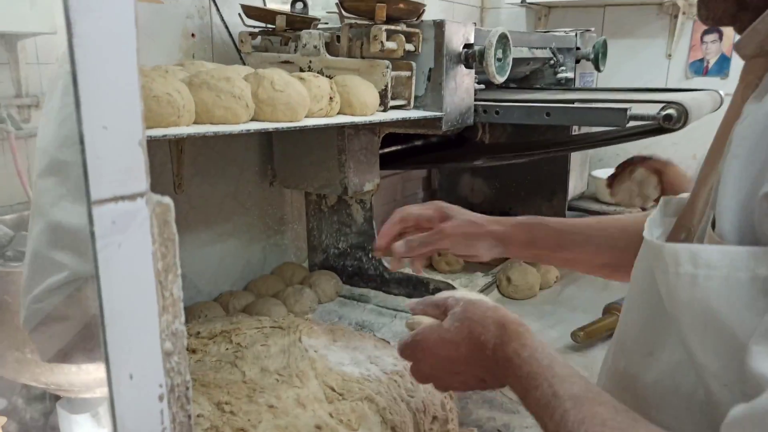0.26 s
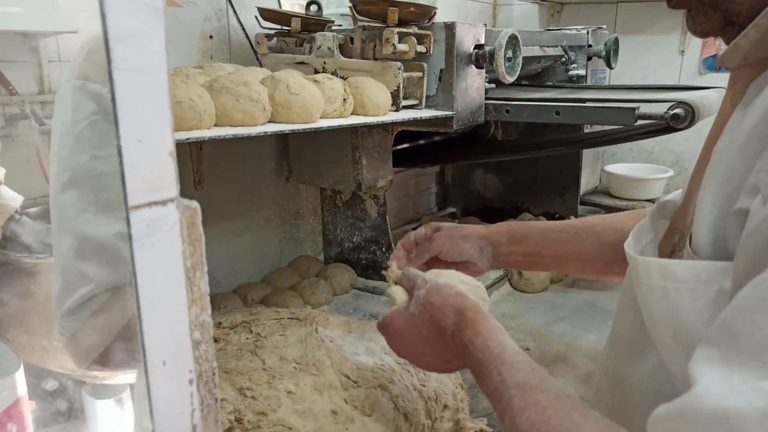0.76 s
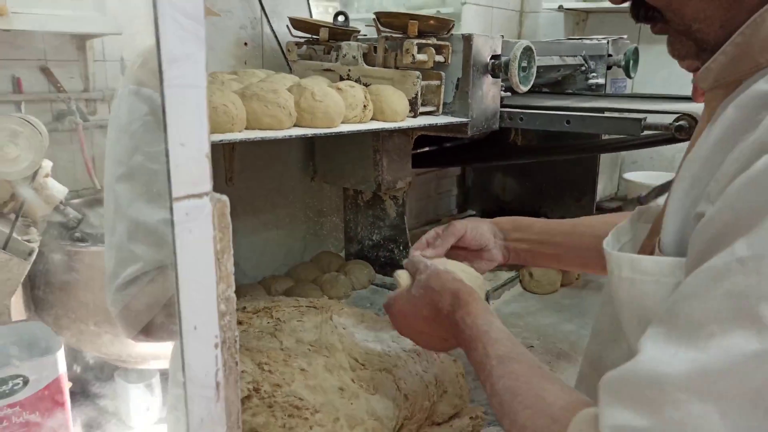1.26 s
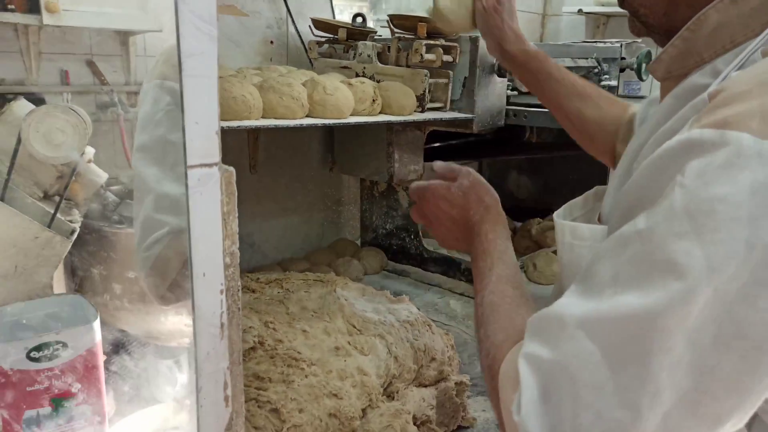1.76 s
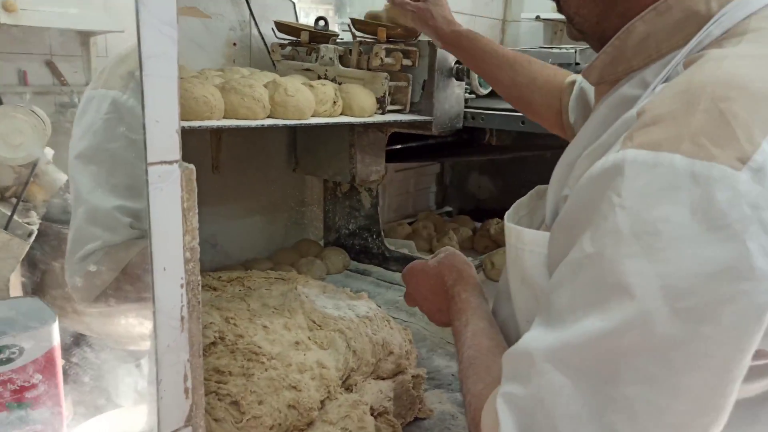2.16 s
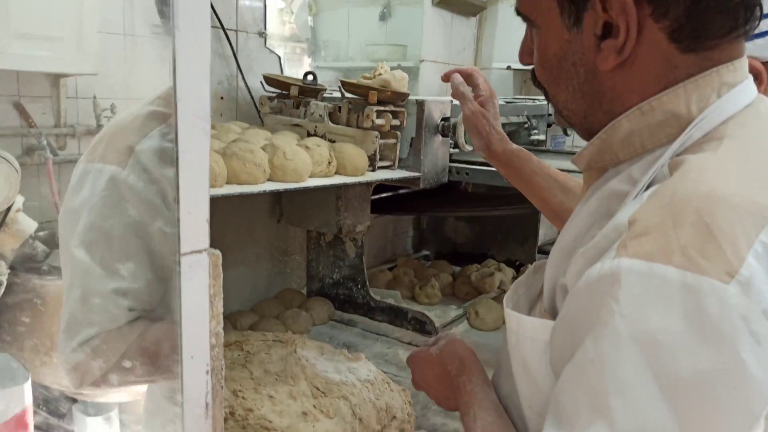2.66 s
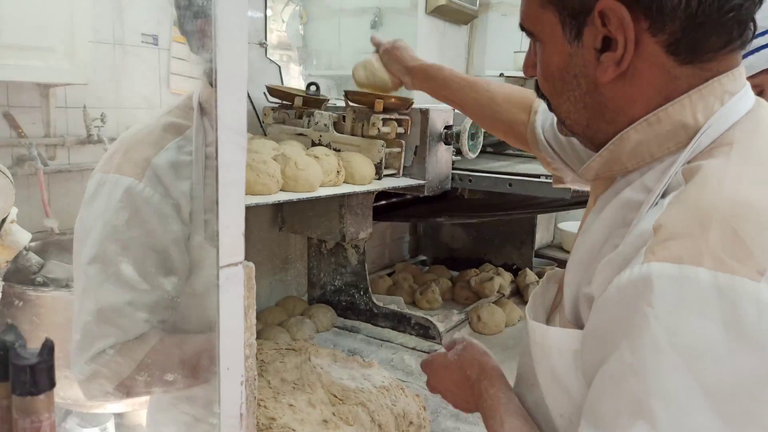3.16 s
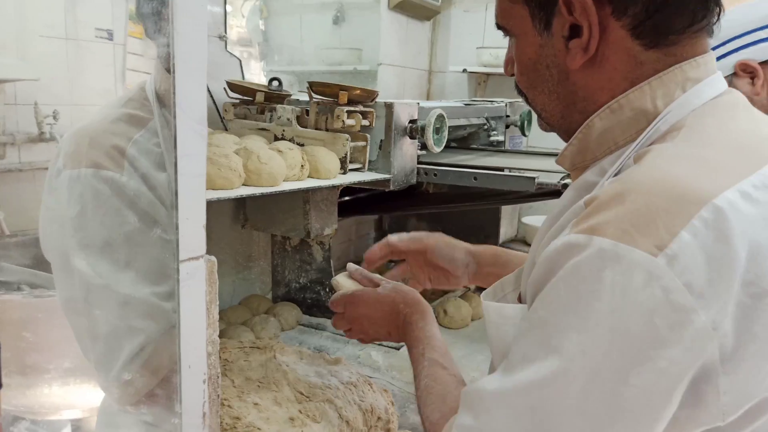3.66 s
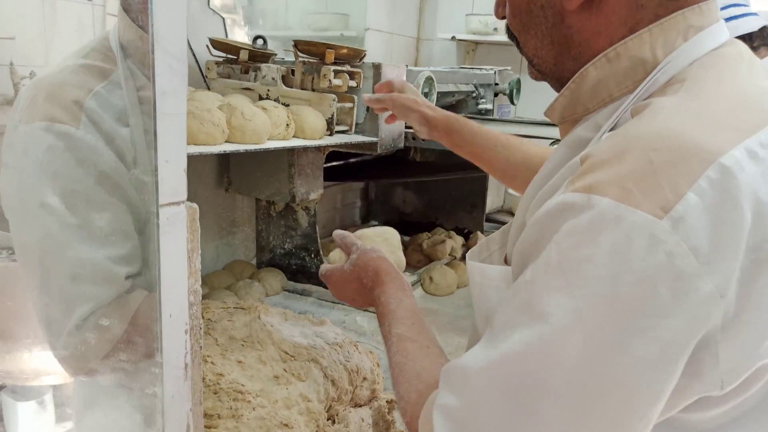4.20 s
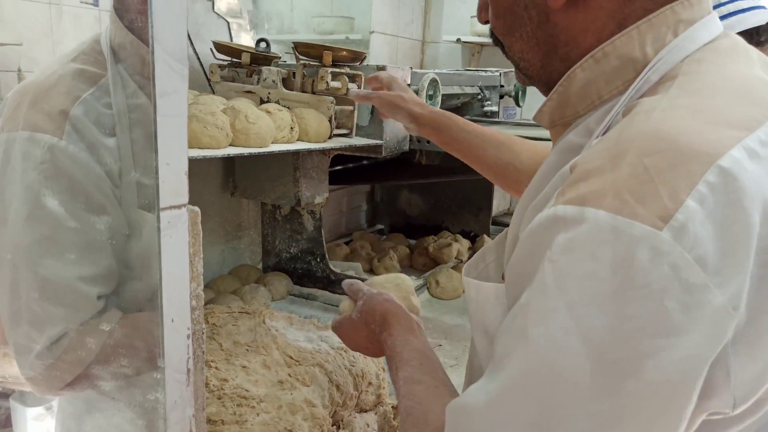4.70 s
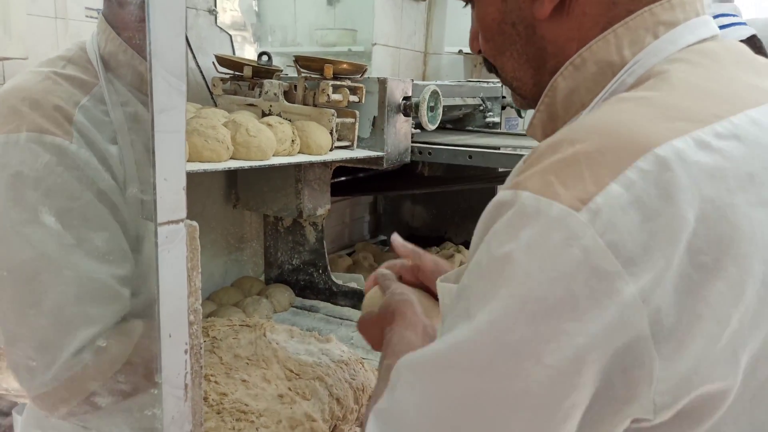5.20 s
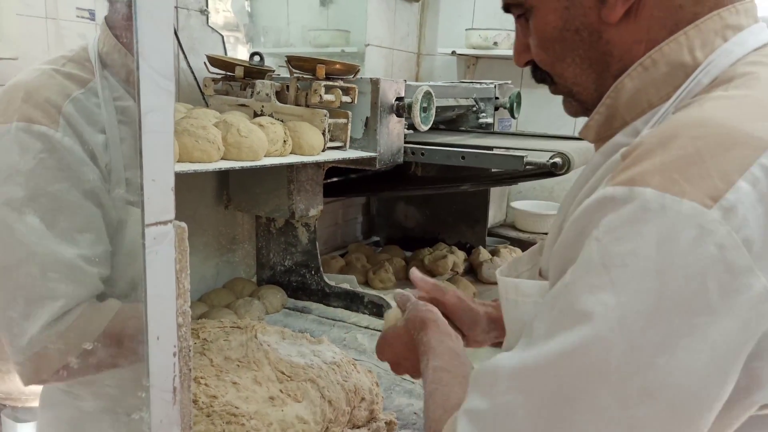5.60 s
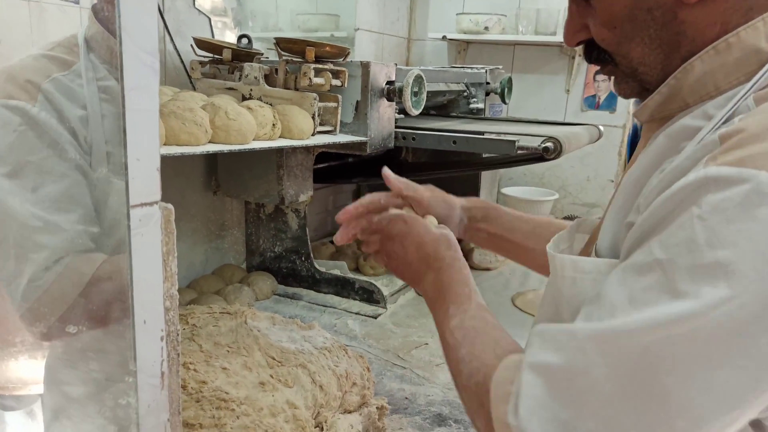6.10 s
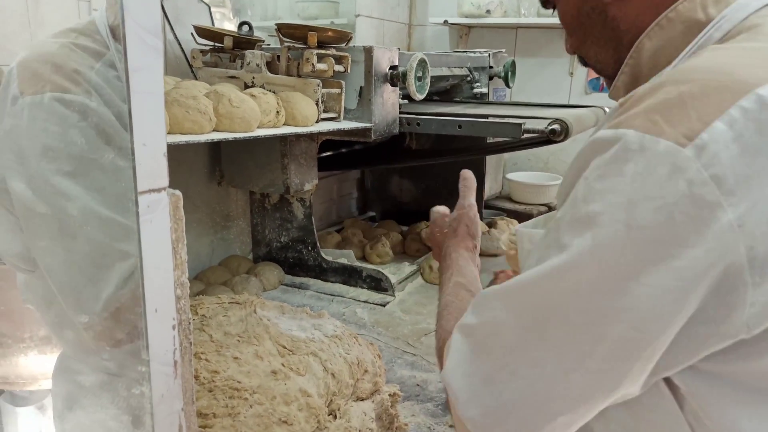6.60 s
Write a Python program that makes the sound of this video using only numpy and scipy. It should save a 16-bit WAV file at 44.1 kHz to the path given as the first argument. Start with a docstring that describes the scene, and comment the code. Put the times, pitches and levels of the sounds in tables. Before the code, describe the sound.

Close dough pat, two hollow knocks and bursts of rattling brass scale pans over a constant low motor drone in a tiled bakery.

```python
"""Bakery with a balance scale

In a small tiled bakery, dough machines hum (sines), rumble and hiss (coloured noise) without pause.
Close by a baker pats dough (pulses and damped swings) and drops it on a scale whose beam knocks on its
stops (pulses and shelf modes); brass pans and weights clink (noise and decaying modes) and squeak.
Hands and sleeves rustle, the bench is tapped, pivots tick; the drone dips briefly after each hard knock."""
import sys
import numpy as np
from scipy import signal
from scipy.fft import rfft, irfft, next_fast_len
from scipy.io import wavfile
from scipy.ndimage import uniform_filter1d, minimum_filter1d, map_coordinates

SR = 44100
rng = np.random.default_rng(int(sys.argv[2]) if len(sys.argv) > 2 else 0)


def master_out(mix):
    """Clip the mix to full scale and print it as 16-bit PCM to the path in sys.argv[1]."""
    frames = np.transpose(np.atleast_2d(mix))
    ceiling = np.clip(frames, -1, 1)
    pcm = np.round(ceiling * 32767).astype(np.int16)
    wavfile.write(sys.argv[1], SR, pcm)


N = 302085

# Relative noise spectrum of the drives' rumble [freq_hz, density_db_per_hz]
RUMBLE_SPECTRUM = [(15, -83), (25, -47), (37, -36.5), (70, -10), (82, -10.5), (102, -2), (125, -10),
                   (189, -2.5), (240, -10), (280, -10.5), (362, -11), (452, -17.5), (510, -20.5),
                   (555, -15), (1500, -34.5), (1950, -51), (3300, -120)]
# Relative noise spectrum of the belts' hiss [freq_hz, density_db_per_hz]
HISS_SPECTRUM = [(400, -7.5), (900, -3.5), (1600, -6), (2450, -6), (3040, -9.5), (3470, -6), (4550, -6),
                 (4950, -16), (5900, -13.5), (6500, -6), (7550, -9.5), (8400, -18.5), (12000, -27.5),
                 (16000, -25.5)]
# Resonances of the machine housings, relative levels [freq_hz, width_hz, level_db]
HOUSING_MODES = [(126.3, 6.1, 5.5), (149.2, 14.3, 2), (174.2, 6.8, -3), (190.4, 10.6, 0), (275.7, 14.8, 0),
                 (307.1, 19.6, -2), (356.3, 11.4, -6), (406.6, 31, -12.5), (509.4, 28.5, -7),
                 (532.5, 12, -11), (633, 18, -22), (762, 37, -18)]
# Lines of the motors, against the hum level [freq_hz, level_db]
MOTOR_LINES = [(100.45, 1), (73.7, -14.5), (649, -23.5), (519.5, -24), (1165, -44)]
# Slow drift of the machines' level [time_s, hum_db, rumble_db]
MACHINE_DRIFT = [(0, -28, -27.5), (2.6, -30, -29), (3.15, -30, -25), (3.75, -30.5, -27.5),
                 (4.2, -28, -28.5), (5.4, -31.5, -27.5), (6.5, -27.5, -27), (6.85, -32.5, -27.5)]
HUM_WAVER_DB, HUM_WAVER_RATE = 0.03, 6.5  # depth; random knots per second
HISS_DB, HISS_FALL_DB_PER_S = -37.5, 0.16
HISS_DIRECT_DB, LEFT_LEAD_S = -9, 0.00026  # the part of the hiss that arrives at the left first
# The drone dips by as much as the thud passes a threshold; the hum takes all of it, the rest a share
DIP_OVER_DB, DIP_S, RUMBLE_DIP_SHARE, HISS_DIP_SHARE = -20, 0.049, 0.31, .12

# Likeness of left and right in a diffuse noise [freq_hz, likeness_ratio]
LIKENESS = [(60, 1), (130, 1), (260, 0.83), (500, 0.87), (1000, 0.052), (2500, 0.035), (12000, .05)]
# Decay time of the tiled room [freq_hz, t60_s]
ROOM_DECAY = [(150, 0.34), (1000, 0.48), (4000, 0.36), (8000, 0.19), (15000, 0.24)]
# Tone of the whole sound, almost empty from 8.8 to 11.3 kHz [freq_hz, gain_db]
TONE_RESPONSE = [(20, -0.5), (8450, 1.5), (8850, -25), (10200, -31.5), (11300, -30), (11750, 5),
                 (13000, 3.5), (16000, 1)]
TOP_HZ = 15800

# Hands and sleeves brushing over dough [centre_s, half_length_s, level_db]
RUBS_TIMED = [(0.21, 0.036, -39), (0.89, 0.16, -39), (1.068, 0.065, -33.5), (1.85, 0.1, -37.5),
              (4.407, 0.037, -40.5), (5.32, 0.074, -39), (5.889, 0.095, -39)]
# Relative spectrum of the friction [freq_hz, density_db_per_hz]
CLOTH_SPECTRUM = [(600, -31.5), (1500, 1), (4000, 1.5), (5400, -3.5), (7200, 5.5), (8400, -10),
                  (13500, -19), (16000, -12)]

# Dry ticks of the scale's pivots, too light to ring it [start_s, level_db]
TICKS_TIMED = [(4.5945, -25), (4.9575, -26.5), (4.962, -28.5)]
# Relative spectrum of a pivot tick [freq_hz, density_db_per_hz]
PIVOT_SPECTRUM = [(900, -20), (1500, -12), (2700, -10), (3700, 2.5), (4500, -1.5), (5400, -9.5), (6500, -2),
                  (7700, -3), (9000, -15.5), (16000, -23)]
PIVOT_T60_S = 0.031

# Squeaks of thin metal [centre_s, half_length_s, pitch_hz, level_db]
SQUEAKS_TIMED = [(0.212, 0.026, 7450, -39.5), (.205, .02, 6570, -44), (0.25, .024, 6570, -41.5),
                 (3.83, .014, 3435, -43), (4.388, 0.0099, 7000, -38)]
SQUEAK_WAVER, SQUEAK_FLUTTER_DB = .004, 3  # share of the pitch; depth

# Light taps on the wooden bench [start_s, click_db, body_db]
TAPS_TIMED = [(0.4644, -23, -20.5), (.469, -26, -22.5), (.477, -25.5, -33.5), (1.357, -27.5, -42.5),
              (1.424, -37.5, -25.5), (4.145, -29.5, -41), (6.165, -36, -29.5)]
# Relative spectrum of the click on wood [freq_hz, density_db_per_hz]
WOOD_SPECTRUM = [(300, -1), (900, -2.5), (1100, -8.5), (1700, 6), (2100, -3), (2600, -1), (4400, -8),
                 (5400, -18), (7400, -6), (9000, -29), (15000, -31)]
# Relative spectrum of the bench's body [freq_hz, density_db_per_hz]
BENCH_SPECTRUM = [(100, -13), (200, 1.5), (340, 8), (480, -5), (650, -21), (900, 0), (1200, -18),
                  (3000, -40.5)]

# The palm, then the fingers land on the dough [start_s, thump_db, smack_db, thump_hz]
SLAPS_TIMED = [(1.6529, -19, -13.5, 330), (1.6565, -21.5, -12.5, 290), (1.6611, -12.5, -24, 210),
               (1.6709, -28, -20.5, 210), (1.674, -31, -18.5, 210)]
# Relative spectrum of skin meeting dough [freq_hz, density_db_per_hz]
SMACK_SPECTRUM = [(300, -7.5), (600, -3.5), (900, -3), (1250, 1.5), (1650, -6.5), (2000, -17), (2600, -19),
                  (4500, -29), (7000, -21), (14000, -54)]
# Relative spectrum of the puff of the dough [freq_hz, density_db_per_hz]
DOUGH_SPECTRUM = [(35, -19), (80, -15), (130, 10.5), (250, 12), (450, -11), (750, -10), (1200, -11.5),
                  (2200, -19), (4000, -22), (8000, -21.5), (16000, -53)]
# Resonances of the hollow between the cupped hands [freq_hz, level_db, t60_s]
HOLLOW_MODES = [(965, -1, 0.11), (1150, 0, 0.09), (1353, -6.5, .08)]
HOLLOW_DB = -16  # ring of the hollow against the slap
THUMP_T60_S, THUMP_DB = .035, 3  # the dough yields in a few dead swings; level against its puff

# The beam hits its stop [start_s, thud_db, shelf_db, click_db, push_db]
KNOCKS_TIMED = [(2.4665, -10, -14.5, -20, -23), (2.8219, -11.5, -12.5, -21, -37)]
# Modes of the scale on its shelf [freq_hz, level_db, t60_s]
SHELF_MODES = [(186, -8, .2), (275, -9, .14), (358, -1, .19), (411, -7, .15), (452, -7, .11),
               (500, -6, .12), (541, -3, .18), (582, -7, .14), (628, -3.5, .2), (695, -8, .14),
               (763, -8, .13), (810, -10, .11), (860, -10.5, .12), (936, -16, .12), (1000, -17, .12),
               (1139, -19, .12), (1330, -21, .1)]
# Relative spectrum of the thud [freq_hz, density_db_per_hz]
THUD_SPECTRUM = [(30, -25.5), (100, -15.5), (200, -3.5), (350, 2), (500, 1.5), (650, -0.5), (830, -0.5),
                 (1050, -15.5), (1300, -18), (1800, -21.5), (3500, -32.5), (8000, -49)]
# Relative spectrum of the click on the stop [freq_hz, density_db_per_hz]
CLICK_SPECTRUM = [(500, -28), (1500, 1.5), (4000, -2), (5400, -10), (7200, 0), (9000, -13), (15000, -35)]
BOUNCE_S, BOUNCE_DB = 0.011, -4  # the beam bounces once on its stop
PUNCH_DB = 7  # the shelf flexes as a whole at the blow; against the thud
PUSH_HZ, PUSH_T60_S = 52, .07  # the bench gives under the blow

# The scale is jolted and its metal parts strike and rattle
# [start_s, clash_db, pan_db, weight_db, beam_db, frame_db, rattle_length_s, first_rebound_db]
CLINKS_TIMED = [(1.4304, -27, -55.5, -28, -38, -37.5, .003, 1),
                (1.4348, -15, -52, -16.5, -30, -38.5, 0.0031, -6.5),
                (1.4398, -17, -42, -17, -34, -41, .004, -12),
                (1.448, -17.5, -46, -18.5, -30, -40, 0.011, -14),
                (1.461, -26, -49, -28.5, -36, -44, .02, -2),
                (1.488, -27.5, -54, -28, -39.5, -45, 0.0047, -9.5),
                (2.1035, -17.5, -42.5, -36.5, -19.5, -31.5, .010, -7),
                (2.117, -19, -45, -36, -24.5, -31, .02, -1.5), (2.294, -36.5, -56, -50, -51, -37, .006, 5),
                (2.303, -26, -52, -38.5, -41, -29, .004, -11),
                (2.3088, -22.5, -57, -41, -40, -25.5, 0.0029, -6.5),
                (2.7365, -26, -55, -38.5, -35.5, -37, .003, -3.5),
                (2.745, -21.5, -54, -29, -33, -44, .026, -2.5),
                (3.060, -12.5, -23, -38, -34, -16.5, 0.0039, -2.5),
                (3.072, -16.5, -27.5, -40, -38, -34, .011, -9.5),
                (3.089, -15.5, -25.5, -38, -31, -38.5, .008, 0),
                (3.106, -21, -28, -38.5, -32, -38.5, .010, -2),
                (3.122, -11, -22, -39.5, -35.5, -35, .028, -6.5),
                (3.2172, -14, -26.5, -33, -29, -24, .003, -2),
                (3.229, -16, -30, -30.5, -31.5, -37, 0.0032, -8),
                (3.2405, -13.5, -28.5, -34, -29.5, -40.5, 0.011, -10),
                (3.262, -16, -29.5, -31, -32, -39, .010, -3),
                (3.283, -17.5, -29, -37.5, -37, -38, .025, -8)]
# Relative spectrum of the metal clash [freq_hz, density_db_per_hz]
CLASH_SPECTRUM = [(500, -8), (900, 0.5), (1250, -12.5), (1600, 0), (2000, -5), (2400, -1.5), (3100, -2.5),
                  (4100, -2), (5200, -6), (6600, 6.5), (7400, -5.5), (8400, -0.5), (11600, -11.5),
                  (13300, -17.5), (16000, -11.5)]
# Modes of the pan [freq_hz, level_db, t60_s]
PAN_MODES = [(897, -9.5, 0.12), (1133, -13.5, 0.18), (1467, -8.5, 0.23), (1582, -5.5, .14),
             (1680, -8, 0.12), (1780, -14.5, .14), (2180, -18.5, 0.16), (2280, -18, .16), (2620, -18, .13),
             (3980, -13, 0.17), (4441, -17.5, .14), (6100, -14.5, .15), (6640, -8, .12), (6700, -9, .14),
             (7430, -5.5, .14), (7400, -9.5, .14)]
# Modes of the brass weight [freq_hz, level_db, t60_s]
WEIGHT_MODES = [(2083, -16, .15), (2170, -20, .1), (2790, -20, .1), (2880, -12, .11), (3025, -14, .1),
                (3607, -21, .1), (4220, -17, .1), (4366, -17, .12), (4590, -7, .14), (4678, -12, .13),
                (6298, -13, .12), (6686, -3, .12), (6835, -3, .1), (6950, 2, .035), (7241, -4, .11),
                (7350, 0, .04), (7530, -3, .12), (7650, -10, .12), (7957, -12, .12), (12840, -14, .1),
                (13350, -16, .1)]
# Modes of the beam [freq_hz, level_db, t60_s]
BEAM_MODES = [(3273, -15, .17), (3850, -16, .11), (4194, -9, .13), (4420, -15, .11), (6487, -4, .15),
              (6660, -1.5, .15), (6833, -2, .12), (7100, -8, .12), (7400, -8, .14), (7650, -4, .18),
              (8010, -8, .14), (8280, -10, .14), (12800, -18, .1), (13300, -17, .12), (14000, -18, .1)]
# Modes of the frame [freq_hz, level_db, t60_s]
FRAME_MODES = [(2455, -14, 0.04), (3360, -10, 0.049), (3734, -2, 0.039), (4120, -5, .08),
               (4430, -9.5, 0.09), (4640, -6.5, .07), (6500, -2.5, .06), (7330, -8, .05), (7600, -7, .07)]
MODE_SPLIT = .003  # random detuning, share of the pitch
REBOUND_COUNT, RATTLE_UNEVEN = 2, .28  # rebounds; irregularity as a share of a gap
RATTLE_FADE_DB, REBOUND_SCATTER_DB = 3.5, 2  # from first to last rebound; random size
TINT_DB, TINT_SPACING_HZ = 4.5, 380  # each contact favours other bands: depth; band spacing
# Left-right lean of the rattle [freq_hz, left_minus_right_db]
RATTLE_LEAN = [(1200, 0), (4000, -1), (6500, -2), (7800, -2.5), (14000, -3)]
# The rattle moves from left toward right [time_s, left_minus_right_db]
SCALE_SIDE_DRIFT = [(2.3, 2), (3.0, 0)]


def amp(db):
    """Decibels are logarithmic: 20 dB is a factor of ten in amplitude."""
    return 10 ** (np.asarray(db) / 20)


def unit(x):
    """Normalisation to an rms of 1."""
    return x / np.sqrt(np.mean(x ** 2) + 1e-20)


def along(points, hz):
    """Interpolation of (freq_hz, value) points on a logarithmic frequency axis."""
    f, v = np.transpose(points)
    return np.interp(np.log(hz + 1), np.log(f + 1), v)


def seconds(count):
    """Sampling: the time of each sample."""
    return np.arange(count) / SR


def wobble(rate):
    """Slow random modulation: a smooth curve through rate random knots a second."""
    return map_coordinates(rng.standard_normal(400), [seconds(N) * rate], mode="wrap")


def filtered(x, response):
    """Linear filtering: the spectrum of x times a response of frequency."""
    n = x.shape[-1]
    m = next_fast_len(n + SR // 4)
    return irfft(rfft(x, m) * response(np.fft.rfftfreq(m, 1 / SR)), m)[..., :n]


def high_pass(x, hz):
    """High-pass filtering: the deepest bass below hz is taken away."""
    return signal.sosfilt(signal.butter(2, hz, "high", fs=SR, output="sos"), x)


def colour(spectrum):
    """Spectral colour: the amplitude response of a (freq_hz, db) table."""
    return lambda hz: amp(along(spectrum, hz))


def noise(response, count=N):
    """Diffuse-field coherence: stereo noise of rms 1, alike in the bass, unrelated in the treble."""
    def mid_side(hz):
        turn = np.arccos(np.clip(along(LIKENESS, hz), -1, 1)) / 2
        return response(hz) * np.array([np.cos(turn), np.sin(turn)])

    mid, side = filtered(rng.standard_normal((2, count)), mid_side)
    return unit(np.array([mid + side, mid - side]))


def burst(spectrum, t60, attack):
    """Contact noise: a short coloured puff of rms about 1 at its start, decaying exponentially."""
    t = seconds(SR // 4)
    fall = amp(-60 * t / t60) * np.minimum(t / attack, 1)
    puff = noise(colour(spectrum), count=len(t)) * fall
    return unit(puff) * np.sqrt(np.mean(fall ** 2))


def blow(spectrum):
    """Minimum-phase impulse: a coloured pulse of peak 1 with its energy at the front."""
    hz = np.fft.rfftfreq(SR // 4, 1 / SR)
    cepstrum = irfft(np.log(colour(spectrum)(hz)), SR // 4)
    causal = 2 * cepstrum[:SR // 8]  # folding the cepstrum gives minimum phase
    pulse = irfft(np.exp(rfft(causal, SR // 4)), SR // 4)
    return pulse / np.abs(pulse).max() * np.ones((2, 1))


def ring(modes, scatter_db, spread, detune):
    """Modal decay in split pairs; strength, pitch and phase at each ear vary with the contact."""
    t = seconds(SR // 4)
    hz, db, t60 = np.transpose(modes + modes)[..., None]
    size = amp(db + scatter_db * rng.standard_normal((2, len(hz), 1))) / np.sqrt(2)
    phase = spread * rng.standard_normal((2, len(hz), 1))
    pitch = hz * (1 + detune * rng.standard_normal(hz.shape))
    angle = (2 * np.pi * pitch * t).astype(np.float32)
    fall = np.exp((-np.log(1000) * t / t60).astype(np.float32))
    in_phase = (size * np.cos(phase))[..., 0] @ (fall * np.sin(angle))
    quadrature = (size * np.sin(phase))[..., 0] @ (fall * np.cos(angle))
    return in_phase + quadrature


def add(track, s, sound):
    """Superposition: mix a sound into the track at time s."""
    part = track[:, round(s * SR):][:, :sound.shape[1]]
    part += sound[:, :part.shape[1]]


def in_room(x, wet_db):
    """Reverberation: the sound plus the delayed, decaying answer of the tiled walls."""
    hz, t, z = signal.stft(rng.standard_normal((2, SR // 2)), SR, nperseg=256)
    decay = amp(-60 * t / along(ROOM_DECAY, hz)[:, None]) * (t > .004)
    tail = signal.istft(z * decay, SR, nperseg=256)[1]
    wet = signal.fftconvolve(x, tail / np.linalg.norm(tail[0]), axes=1)[:, :N]
    return x + amp(wet_db) * wet


def dip():
    """Level depression: decibels by which the drone sinks and recovers after each hard knock."""
    total = np.zeros(N)
    for s, thud_db, *_ in KNOCKS_TIMED:
        age = np.maximum(seconds(N) - s, 0) / DIP_S
        total += max(thud_db - DIP_OVER_DB, 0) * age * np.exp(1 - age)  # deepest after DIP_S
    return total


def from_left(spectrum):
    """Interaural delay: noise that reaches the left side first."""
    lead = lambda hz: np.exp(1j * np.pi * hz * LEFT_LEAD_S * np.array([[1], [-1]]))
    return unit(filtered(rng.standard_normal(N), lambda hz: colour(spectrum)(hz) * lead(hz)))


def housing_response(f):
    """Resonance: the powers of the housing peaks add."""
    return np.sqrt(sum(amp(db) ** 2 / (1 + (2 * (f - hz) / width) ** 2) ** 2
                       for hz, width, db in HOUSING_MODES))


def machines():
    """Forced vibration: motors hum at twice the mains rate, drives shake the housings, belts hiss."""
    t = seconds(N)
    s, *columns = np.transpose(MACHINE_DRIFT)
    hum_db, rumble_db = [np.interp(t, s, c) for c in columns]
    dip_db = dip()
    lines = sum(amp(db) * np.sin(2 * np.pi * hz * t + 0.062 * wobble(3.0)) for hz, db in MOTOR_LINES)
    hum = np.sqrt(2) * amp(hum_db - dip_db + HUM_WAVER_DB * wobble(HUM_WAVER_RATE)) * lines

    shake = amp(1.15 * wobble(13)) * noise(housing_response)
    rumble = amp(-1.5 + 0.83 * wobble(22)) * noise(colour(RUMBLE_SPECTRUM))
    drives = amp(rumble_db - RUMBLE_DIP_SHARE * dip_db) * (shake + rumble)

    belts = unit(noise(colour(HISS_SPECTRUM)) + amp(HISS_DIRECT_DB) * from_left(HISS_SPECTRUM))
    hiss_db = HISS_DB - HISS_FALL_DB_PER_S * t - HISS_DIP_SHARE * dip_db + 0.64 * wobble(6.3)
    return hum + drives * amp([[.6], [-.6]]) + amp(hiss_db) * belts


def hands():
    """Sliding friction: each stroke is a grainy swell of noise."""
    t = seconds(N)
    strokes = sum(amp(db) * np.exp(-((t - s) / length) ** 2) for s, length, db in RUBS_TIMED)
    return strokes * amp(2.2 * wobble(55)) * noise(colour(CLOTH_SPECTRUM))


def ticks():
    """Stick and slip: a knife edge shifts in its seat with a short, dry snap."""
    track = np.zeros((2, N))
    for s, db in TICKS_TIMED:
        add(track, s, amp(db) * burst(PIVOT_SPECTRUM, t60=PIVOT_T60_S, attack=0.0003))
    return in_room(track, wet_db=-7.5)


def squeaks():
    """Friction-driven oscillation: metal slides on metal and sings on one wavering note."""
    t = seconds(N)
    track = np.zeros(N)
    for s, length, hz, db in SQUEAKS_TIMED:
        phase = 2 * np.pi * np.cumsum(hz * (1 + SQUEAK_WAVER * wobble(50))) / SR
        track += amp(db) * np.exp(-((t - s) / length) ** 2) * np.sin(phase)
    return in_room(track * amp(SQUEAK_FLUTTER_DB * wobble(55)) * np.ones((2, 1)), wet_db=-4.5)


def taps():
    """Impact on wood: light things set down give a crisp click over a short low body."""
    track = np.zeros((2, N))
    for s, click_db, body_db in TAPS_TIMED:
        click = amp(click_db) * burst(WOOD_SPECTRUM, t60=0.068, attack=0.0007)
        body = amp(body_db) * burst(BENCH_SPECTRUM, t60=0.11, attack=.0012)
        add(track, s, click + body)
    return in_room(track, wet_db=-9.5)


def slaps():
    """Damped impact and cavity resonance: hands pop and thump on dough, and their hollow sounds."""
    track = np.zeros((2, N))
    t = seconds(SR // 4)
    for s, thump_db, smack_db, hz in SLAPS_TIMED:
        skin = burst(SMACK_SPECTRUM, t60=0.024, attack=0.00046)
        pop = amp(-2) * blow(SMACK_SPECTRUM) + amp(-0.5) * skin
        hollow = amp(HOLLOW_DB) * ring(HOLLOW_MODES, scatter_db=2.5, spread=0.69, detune=0.021)
        swing = -np.sin(2 * np.pi * hz * t) * amp(THUMP_DB - 60 * t / THUMP_T60_S)
        thump = swing + amp(-3.5) * burst(DOUGH_SPECTRUM, t60=0.13, attack=0.0007)
        add(track, s, amp(thump_db) * thump + amp(smack_db) * (pop + hollow))
    return in_room(high_pass(track, hz=85), wet_db=-9.0)


def knocks():
    """Impulsive excitation: beam meets stop with click, punch and deep push; the shelf's ring builds up."""
    track, pushes = np.zeros((2, 2, N))
    t = seconds(SR // 4)
    build = 1 - np.exp(-t / 0.0025)
    push = np.sin(2 * np.pi * PUSH_HZ * t) * amp(-60 * t / PUSH_T60_S) * np.ones((2, 1))
    for s, thud_db, shelf_db, click_db, push_db in KNOCKS_TIMED:
        shelf = amp(shelf_db) * build * ring(SHELF_MODES, scatter_db=0.0, spread=0.43, detune=0.003)
        punch = amp(PUNCH_DB) * blow(THUD_SPECTRUM)
        thud = punch + amp(-4.5) * burst(THUD_SPECTRUM, t60=0.16, attack=0.0012)
        long_click = amp(-3.5) * burst(CLICK_SPECTRUM, t60=0.19, attack=0.00093)
        click = long_click + amp(3.5) * burst(CLICK_SPECTRUM, t60=0.016, attack=.0004)
        knock = shelf + amp(thud_db) * thud + amp(click_db) * click
        add(track, s, knock * amp([[.5], [-.5]]))
        add(track, s + BOUNCE_S, amp(thud_db + BOUNCE_DB) * blow(THUD_SPECTRUM))
        add(pushes, s, amp(push_db) * push)
    return in_room(high_pass(track, hz=50), wet_db=-11.5) + pushes


def rattle(length, rebound_db):
    """Repeated impact: (delay_s, level_db) of a contact and its uneven, fading rebounds."""
    slip, size = rng.standard_normal((2, REBOUND_COUNT))
    delay = length * np.abs(np.arange(1, REBOUND_COUNT + 1) + RATTLE_UNEVEN * slip) / REBOUND_COUNT
    db = rebound_db - RATTLE_FADE_DB * np.linspace(0, 1, REBOUND_COUNT) + REBOUND_SCATTER_DB * size
    return [(0, 0), *zip(delay, db)]


def chatter(sound, rate, fade, bounce_db):
    """Convolution with random impulses: tiny rebounds follow a contact at uneven times."""
    t = seconds(SR // 25)
    struck = rng.random(len(t)) < rate / SR
    rebounds = struck * rng.standard_normal((2, len(t))) * amp(bounce_db) * np.exp(-t / fade)
    rebounds[:, 0] = 1
    return signal.fftconvolve(sound, rebounds, axes=1)[:, :sound.shape[1]]


def tinted(sound):
    """Position-dependent excitation: some bands are raised and others lowered by chance."""
    bands_db = TINT_DB * rng.standard_normal(80)
    band = np.fft.rfftfreq(sound.shape[1], 1 / SR) / TINT_SPACING_HZ
    gain = amp(np.interp(band, np.arange(len(bands_db)), bands_db))
    later = np.roll(sound, 128)  # the filter also spreads backward; the first 128 samples are cut
    return irfft(rfft(later) * unit(gain), sound.shape[1])[:, 128:]


def clinks():
    """Modal excitation by impact: contacts clash, chatter and ring pan, weight, beam and frame."""
    track = np.zeros((2, N))
    for s, clash_db, pan_db, weight_db, beam_db, frame_db, length, rebound_db in CLINKS_TIMED:
        for delay, db in rattle(length, rebound_db):
            clash = amp(clash_db) * tinted(burst(CLASH_SPECTRUM, t60=0.014, attack=0.00045))
            pan = amp(pan_db) * ring(PAN_MODES, scatter_db=4.0, spread=2.22, detune=0.008)
            weight = amp(weight_db) * ring(WEIGHT_MODES, scatter_db=4.0, spread=2.76, detune=MODE_SPLIT)
            beam = amp(beam_db) * ring(BEAM_MODES, scatter_db=2.5, spread=3.65, detune=MODE_SPLIT)
            frame = amp(frame_db) * ring(FRAME_MODES, scatter_db=3, spread=3.2, detune=0.015)
            add(track, s + delay, amp(db) * chatter(clash, rate=480, fade=0.022, bounce_db=-4.5))
            add(track, s + delay, amp(db) * (pan + weight + beam + frame))
    sides = np.array([[.5], [-.5]])
    leaning = filtered(track, lambda hz: amp(along(RATTLE_LEAN, hz) * sides))
    side_db = np.interp(seconds(N), *np.transpose(SCALE_SIDE_DRIFT))
    return in_room(leaning * amp(side_db * sides), wet_db=-6.0)


def scene():
    """Superposition of the machines and the baker's work."""
    background = machines() + hands()
    light_contacts = ticks() + squeaks() + taps()
    return background + light_contacts + slaps() + knocks() + clinks()


def limited(x, ceiling_db, release):
    """Peak limiting: gain falls just ahead of a peak and recovers at release dB a second."""
    over = np.maximum(20 * np.log10(np.abs(x).max(0) + 1e-9) - ceiling_db, 0)
    recovery = release * seconds(N)
    gain_db = recovery - np.maximum.accumulate(over + recovery)
    return x * amp(uniform_filter1d(minimum_filter1d(gain_db, size=48), size=48))


def record(dry):
    """Final shaping: a gap in the treble, a level that rises at the start, limited peaks and a cut top."""
    rise = 1 - 0.66 * np.exp(-seconds(N) / 0.11)
    sound = filtered(dry, colour(TONE_RESPONSE)) * rise
    sound = limited(sound, ceiling_db=-1, release=250)
    return filtered(sound, lambda hz: hz < TOP_HZ)


dry = scene()
out = record(dry)
master_out(out)
```